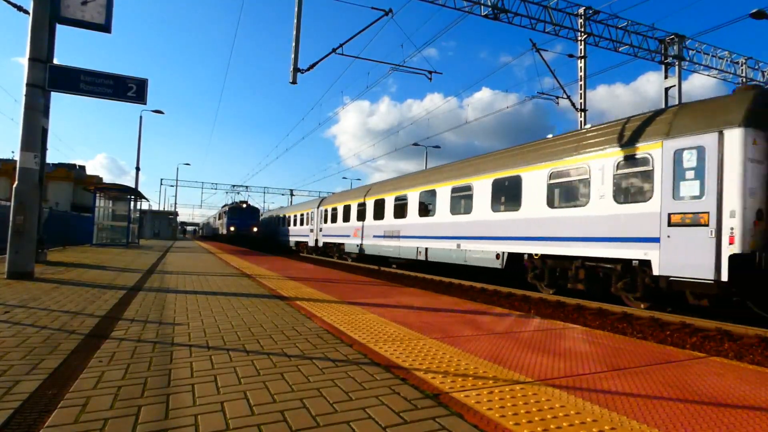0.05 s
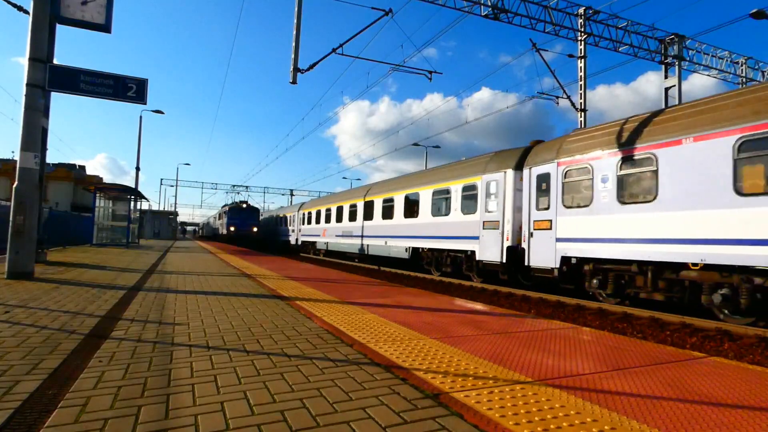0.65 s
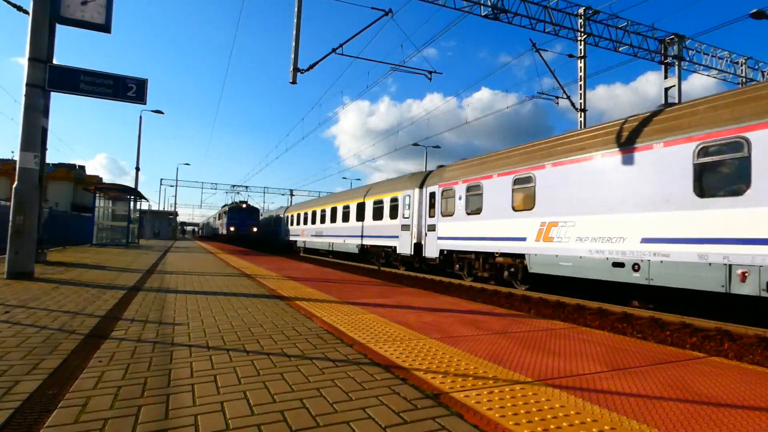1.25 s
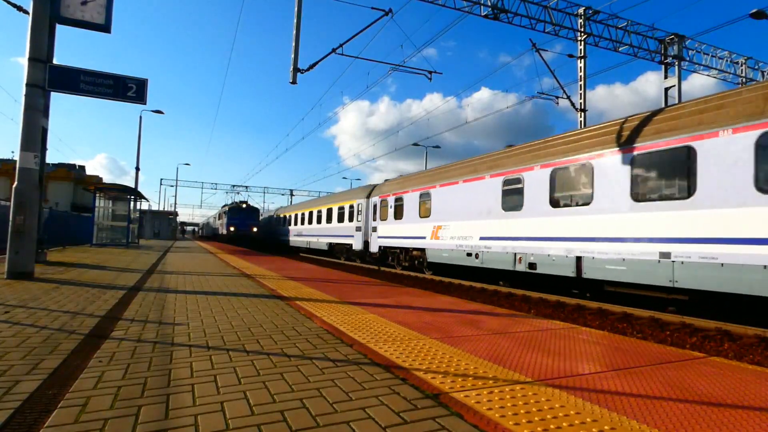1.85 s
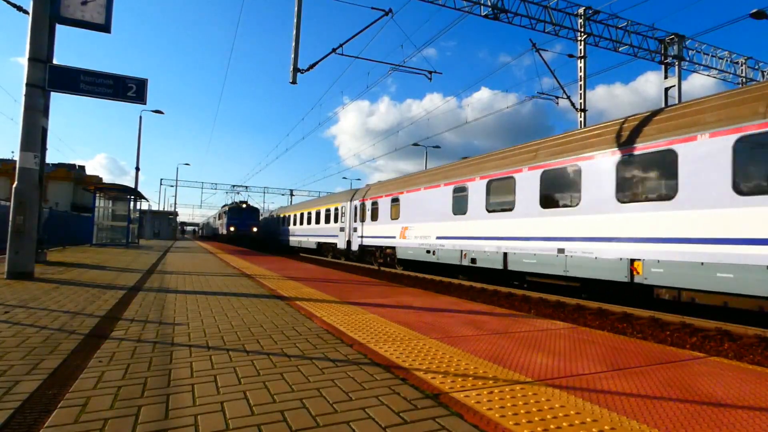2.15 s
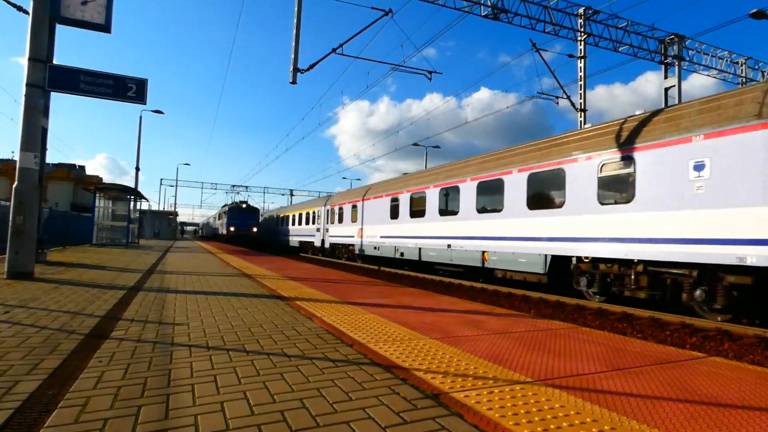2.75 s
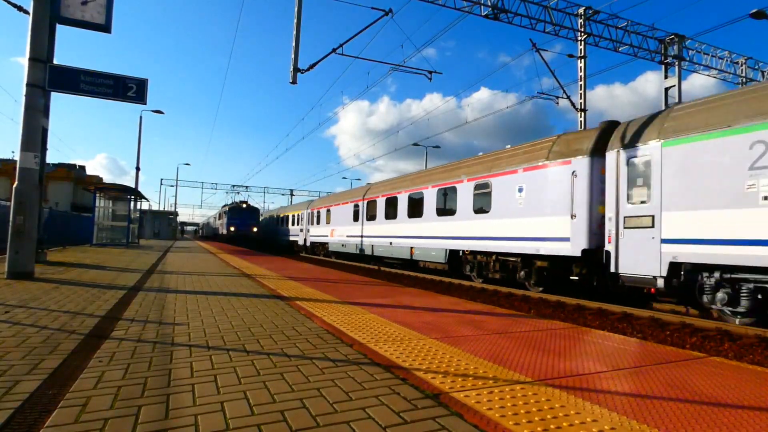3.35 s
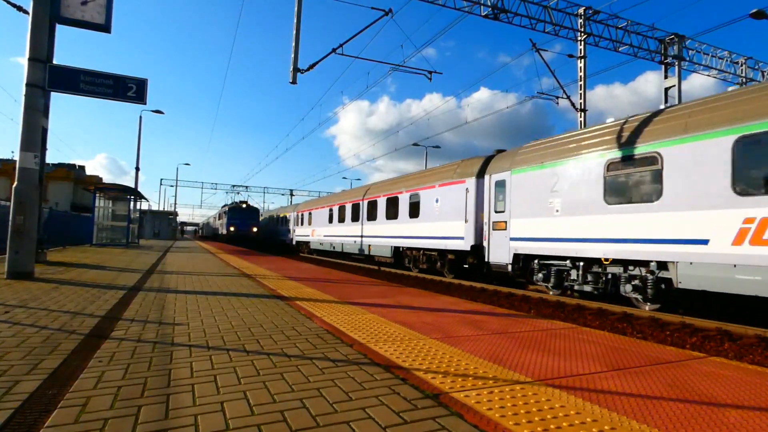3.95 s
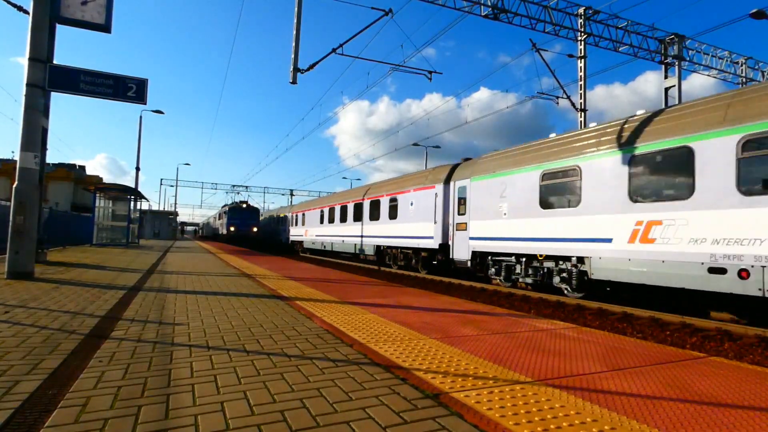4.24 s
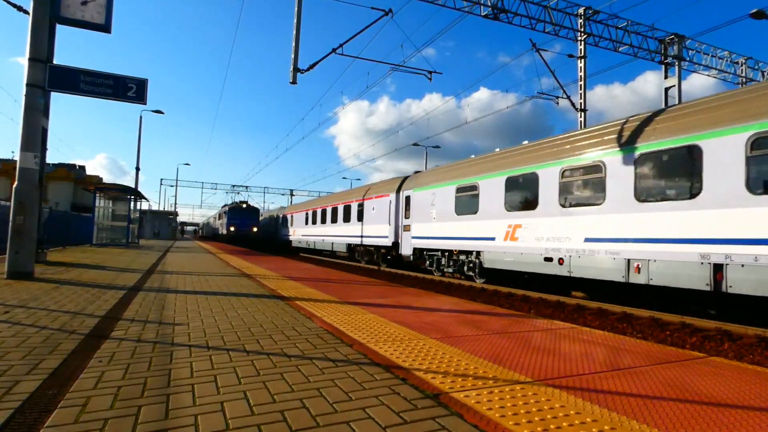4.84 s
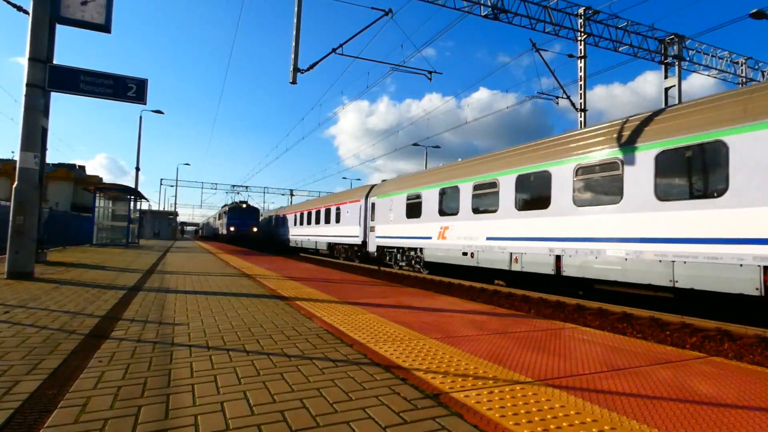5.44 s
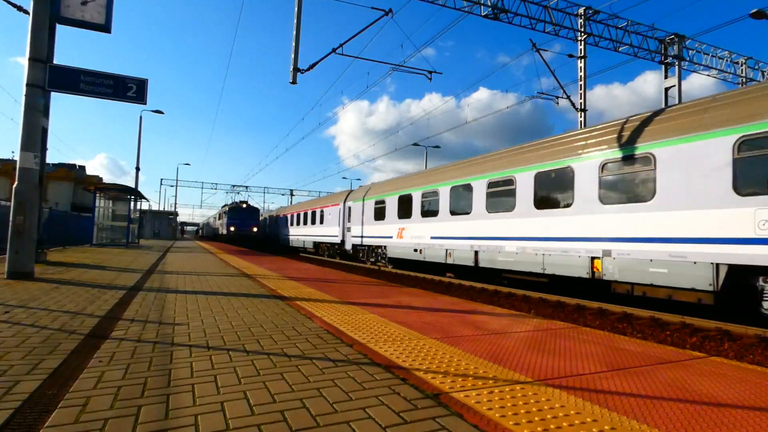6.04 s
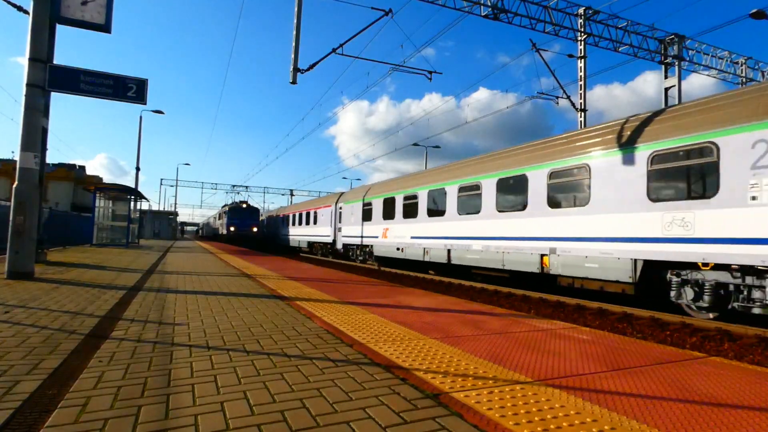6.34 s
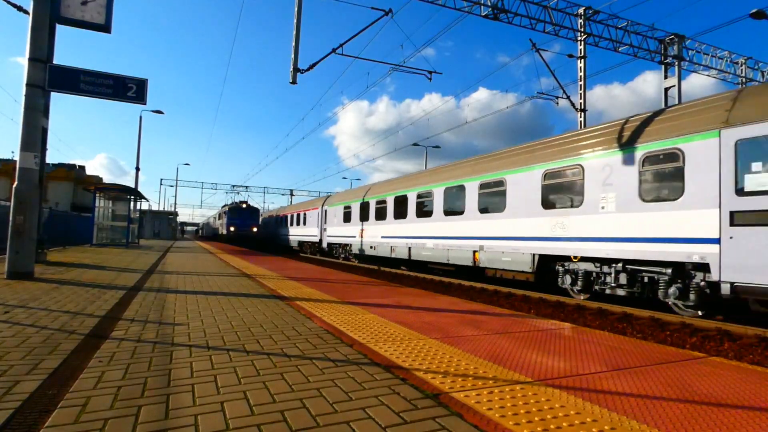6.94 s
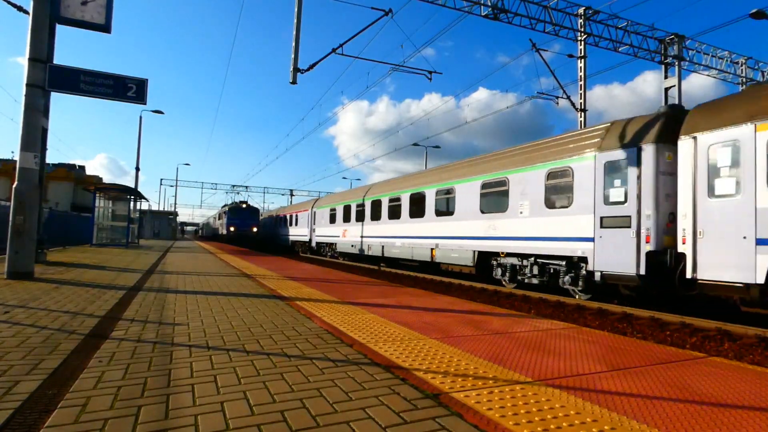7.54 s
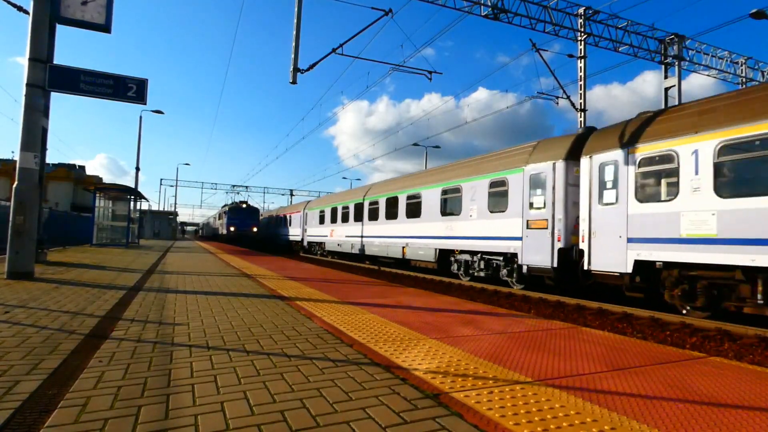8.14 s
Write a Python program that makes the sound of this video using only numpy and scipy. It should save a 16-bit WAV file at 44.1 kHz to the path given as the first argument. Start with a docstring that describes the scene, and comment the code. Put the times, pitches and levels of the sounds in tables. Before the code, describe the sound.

High, fluttering brake squeal from a slowing passenger train, over wheel rumble that gradually dies down.

```python
"""Station platform: a passenger train brakes to the right of a camera; the wheels' rumble dies down.
Two brake discs stick and slip, squealing near 4.6 kHz, each gliding down as it passes (Doppler),
over the blurred squeal of all the other bogies and the scrape of sliding pads.
Towards the end the pads grab: the squeal gains an undertone and rasps in short squeaks."""
import sys
import numpy as np
from scipy import signal
from scipy.fft import rfft, irfft, next_fast_len
from scipy.io import wavfile
from scipy.ndimage import uniform_filter1d, map_coordinates

SR = 44100
rng = np.random.default_rng(int(sys.argv[2]) if len(sys.argv) > 2 else 0)


def bounce(signal):
    """Save signal as a 16-bit WAV file at the path given by the first command-line argument."""
    frames = np.transpose(np.atleast_2d(signal))
    limited = np.clip(frames, -1, 1)
    pcm = np.round(limited * 32767).astype(np.int16)
    wavfile.write(sys.argv[1], SR, pcm)


N = 361179
TIME_S = np.arange(N) / SR
START_M_PER_S, BRAKING_M_PER_S2, SOUND_M_PER_S = 10.63, .68, 343
SPEED_M_PER_S = START_M_PER_S - BRAKING_M_PER_S2 * TIME_S

# Two loudest discs: pitch_hz, abreast_s, glide_width_m (how gradually the pitch falls in passing)
FIRST_DISC, SECOND_DISC = (4580, 2.0, 11), (4647, 6.92, 15.2)
# How hard the pads bite: time_s, bite_db. All table levels are relative.
PAD_BITE = [(0, -15.5), (1.5, -5.5), (2.1, -6.5), (2.45, 1), (3, 1), (3.5, -4), (3.9, 0), (4.6, -3.5),
            (5.4, -9), (5.7, -0.5), (5.95, -8), (6.25, -1), (6.5, -4), (6.8, 0.5), (7.15, -4.5), (8.19, -2)]


def amp(db):
    """dB to gain."""
    return 10 ** (np.asarray(db) / 20)


def unit(x):
    """Scale to rms 1."""
    return x / np.sqrt(np.mean(np.abs(x) ** 2) + 1e-20)


def along(points, hz):
    """Interpolate (freq_hz, value) rows on a log axis."""
    freq_hz, value = np.transpose(points)
    return np.interp(np.log(hz + 1), np.log(freq_hz + 1), value)


def curves(rows):
    """One per-sample curve for each column after time_s."""
    time_s, *columns = np.transpose(rows)
    return [np.interp(TIME_S, time_s, column) for column in columns]


def during(rows):
    """1 over a table's time span, with fades outside it."""
    start_s, end_s, fade_s = rows[0][0], rows[-1][0], .15
    return np.interp(TIME_S, [start_s - fade_s, start_s, end_s, end_s + fade_s], [0, 1, 1, 0])


def wobble(rate_hz):
    """Smooth random curve, rate_hz knots a second."""
    knots = rng.standard_normal(int(N * rate_hz / SR) + 4)
    return map_coordinates(knots, [TIME_S * rate_hz])


def filtered(x, response):
    """Apply a frequency response."""
    size = next_fast_len(N + SR // 4)
    return irfft(rfft(x, size) * response(np.fft.rfftfreq(size, 1 / SR)), size)[..., :N]


def side_gain(alike):
    """Side-to-mid ratio for a left-right correlation."""
    return np.tan(np.arccos(np.clip(alike, -1, 1)) / 2)


def stereo(pair, alike):
    """Mix two independent signals to left and right with correlation alike."""
    mid, side = pair[0], side_gain(alike) * pair[1]
    return np.array([mid + side, mid - side])


def pan(x, left_db):
    """Tilt a pair to the left."""
    return x * amp(np.array([left_db, -left_db]) / 2)


def tone(hz):
    """Complex oscillator; real part has rms 1."""
    return np.sqrt(2) * np.exp(2j * np.pi * np.cumsum(hz) / SR)


def rush(spectrum, patchy_db):
    """Stereo noise with time-frequency patches of random gain; mid has rms 1."""
    # Left-right likeness: freq_hz, correlation
    likeness = [(30, .35), (120, .88), (300, .92), (1000, .8), (2500, .8), (4600, .85), (8000, .6),
                (13000, .45)]
    bins = signal.stft(rng.standard_normal((2, N)), nperseg=512)[2]
    patches = uniform_filter1d(rng.standard_normal(bins.shape[1:]), size=5, axis=0)
    patches = uniform_filter1d(patches, size=14, axis=1)
    pair = signal.istft(bins * amp(patchy_db * unit(patches)), nperseg=512)[1][:, :N]
    mid = filtered(pair[0], lambda hz: amp(along(spectrum, hz)))
    side = filtered(pair[1], lambda hz: amp(along(spectrum, hz)) * side_gain(along(likeness, hz)))
    return np.array([mid + side, mid - side]) / np.std(mid)


def scatter(width_hz, alike, order=4):
    """Random complex gain per microphone: many moving paths beating within width_hz."""
    size = next_fast_len(N)
    lowpass = (1 + np.abs(np.fft.fftfreq(size, 1 / SR) / width_hz) ** order) ** -.5
    spectrum = rfft(rng.standard_normal((2, 2 * size)))[:, :size]
    return stereo(unit(np.fft.ifft(spectrum * lowpass)[:, :N]), alike)


def hum(rows, steady, spread_hz):
    """Unsteady tone: a steady part plus a scattered one."""
    hz, db = curves(rows)
    flutter = unit(steady + scatter(spread_hz, alike=.16))
    return during(rows) * amp(db) * np.real(flutter * tone(hz))


def passing(source):
    """A disc's place along the track (m, 0 abreast) and Doppler-shifted pitch (Hz)."""
    pitch_hz, abreast_s, glide_width_m = source
    travelled_m = np.cumsum(SPEED_M_PER_S) / SR
    place_m = travelled_m - travelled_m[round(abreast_s * SR)]
    receding_m_per_s = SPEED_M_PER_S * place_m / np.hypot(place_m, glide_width_m)
    return place_m, pitch_hz * (1 - receding_m_per_s / SOUND_M_PER_S)


def far_rumble():
    """The rest of the train, swelling as the middle coaches pass."""
    # Distant rumble: freq_hz, density_db
    spectrum = [(25, -58), (50, -35), (70, -17), (90, 0.5), (130, 1.5), (220, -1.5), (400, -8.5),
                (900, -42)]
    # Its swell: time_s, level_db
    swell = [(0, -52.5), (3, -57), (4, -51), (5.3, -51.5), (6.2, -57), (8.19, -59)]
    return amp(curves(swell)[0]) * rush(spectrum, patchy_db=3)


def gear_and_coach_hum():
    """Running gear whines and coach bodies drone faintly, sinking in pitch as the train slows."""
    # Both tones: time_s, pitch_hz, level_db
    whine = [(5.6, 780, -61), (6.4, 768, -69), (7.3, 741, -59), (8.19, 715, -62)]
    drone = [(5.0, 233.6, -60), (5.5, 226.2, -51.5), (6.3, 221.6, -55.5), (7.1, 221, -59)]
    return hum(whine, steady=1.4, spread_hz=5.6) + hum(drone, steady=.45, spread_hz=4.2)


def rolling():
    """Wheels on rails: track and coaches rumble, rails roar, the contact hisses with roar and bite."""
    # Rolling noise: time_s, rumble_db, roar_db
    levels = [(0, -28, -28), (.8, -34, -35), (1.3, -38.5, -39), (2.1, -42.5, -44), (3, -43, -44.5),
              (3.8, -41, -43), (5, -44.5, -44), (5.95, -49, -47.5), (6.25, -52.5, -45), (6.5, -54, -50.5),
              (7.9, -58.5, -52), (8.19, -58, -45.5)]
    # Track and coaches, rails, wheel-rail contact: freq_hz, density_db
    rumble = [(25, -50), (60, -39), (95, -23.5), (135, -15), (170, -5.5), (245, -2.5), (300, 0.5),
              (354, -6.5), (421, -0.5), (515, -3.5), (795, -10), (1170, -29.5), (2000, -78)]
    roar = [(350, -55), (600, -2), (672, -3.5), (901, -3.5), (1370, -2.5), (1520, -1), (2340, -4),
            (3340, -6), (4200, -12), (5460, -48), (9240, -120)]
    hiss = [(3000, -24), (4200, -2.5), (5400, 1), (6200, -1.5), (7000, -3.5), (7700, -10), (10000, -8.5),
            (11000, -19), (12300, -18.5), (13900, -36), (14400, -35), (15000, -55)]
    rumble_db, roar_db = curves(levels)
    hiss_db = .51 * roar_db + .21 * curves(PAD_BITE)[0] - 21
    uneven_db = .5 * wobble(14)
    return (amp(rumble_db + .5) * rush(rumble, patchy_db=1.5)
            + amp(roar_db + 2 + uneven_db) * rush(roar, patchy_db=1.46)
            + amp(hiss_db + uneven_db) * rush(hiss, patchy_db=2.5))


def pad_rubbing():
    """Sliding pads excite the discs in broad bands that grow with bite and fade as the train slows."""
    # Bands near the squeal's pitch, its half and its octave: freq_hz, density_db
    scrape = [(2600, -64), (3400, -10), (3700, -9.5), (4100, -3), (4400, 2), (4750, -0.5), (4920, 0),
              (5080, -3.5), (5400, -21.5), (6200, -36.5)]
    grind = [(1500, -32), (2050, -9.5), (2300, 0), (2450, -4), (2700, -9.5), (3300, -11.5), (4000, -31.5)]
    sizzle = [(7300, -17), (8400, -9), (8900, -1), (9100, 4.5), (9400, -4), (9800, -10), (11000, -17),
              (13000, -29)]
    bite_db, = curves(PAD_BITE)
    speed_db = 20 * np.log10(SPEED_M_PER_S / START_M_PER_S)
    bedding_in = np.clip(TIME_S / 2.65, 0, 1) ** 4
    return (amp(.17 * bite_db + 1.8 * speed_db - 29.5) * rush(scrape, patchy_db=2)
            + bedding_in * amp(.18 * bite_db + .42 * speed_db - 40) * rush(grind, patchy_db=2.5)
            + amp(bite_db + .33 * speed_db - 41) * rush(sizzle, patchy_db=2.3))


def bogie_chorus(pitch_hz=4601, spread_hz=51.5, fifth_db=-22.5, gain_db=-3):
    """The other bogies squeal in blurred bands: higher when coming, lower when going."""
    # Joint squeal: time_s, level_db
    level = [(0, -24.5), (1.5, -25.5), (2.2, -31), (2.7, -21), (3.5, -25), (4.3, -21.5), (5, -25.5),
             (5.6, -24.5), (6.2, -28), (6.9, -23.5), (8.19, -26)]
    # Bogie groups: heading (1 coming, 0 abreast, -1 going), level_db
    groups = [(.85, -5.5), (0, -5.5), (-.75, -5)]
    bands = 0
    for heading, db in groups:
        shifted_hz = pitch_hz * (1 + heading * SPEED_M_PER_S / SOUND_M_PER_S)
        bands += amp(db) * scatter(spread_hz, alike=.97, order=6) * tone(shifted_hz)
    pressing = np.clip(TIME_S / 4.7, 0, 1) ** 2  # hard-pressed pads add a partial near 3/2 of the pitch
    fifth = pressing * amp(fifth_db) * scatter(110, alike=.47) * tone(np.full(N, 1.5 * pitch_hz + 60))
    return amp(curves(level)[0] + gain_db) * np.real(bands + fifth)


def pad_squeaks(squeak_db=1, rasp_db=1.5, detune=.0089, waver_hz=36):
    """Each grab of a pad is a short pitched squeak that also rasps through the rigging's modes."""
    # Pad grabs: peak_s, pitch_hz, peak_db, half_width_s
    grabs = [(2.93, 3570, -43.5, .05), (5.05, 3460, -45, .04), (5.15, 3400, -44, .04),
             (5.53, 3445, -39, .035), (5.77, 3420, -44, .04), (6.07, 3430, -41, .07),
             (6.15, 3420, -38, .05), (6.22, 3415, -39, .04), (6.31, 3400, -35, .06), (6.6, 3450, -34, .035),
             (6.78, 3420, -36, .045), (6.9, 3390, -37, .05), (7.1, 3485, -37.5, .03),
             (7.22, 3440, -35, .04), (7.36, 3470, -42, .05), (7.44, 3460, -38, .04),
             (7.56, 3360, -40, .045), (7.63, 3395, -42, .04), (7.76, 3440, -40, .045),
             (7.93, 3420, -43, .035), (8.15, 3445, -42, .035)]
    # Brake rigging modes: freq_hz, width_hz, level_db
    rigging = [(1253, 65, -6), (1500, 50, -11), (1630, 140, -9.5), (2420, 360, -4), (3273, 110, 2.5),
               (4000, 150, -7), (5580, 97, -6.5), (5880, 37, 0.5), (7900, 180, -14), (11683, 240, -19)]
    out, size = np.zeros((2, N + SR)), SR // 4
    offset_s = (np.arange(size) - size // 2) / SR
    freq_hz = np.fft.rfftfreq(size, 1 / SR)
    mode_hz, width_hz, mode_db = np.transpose(rigging)[:, :, None]
    drift_hz = np.pad(waver_hz * wobble(130), size)
    for peak_s, pitch_hz, peak_db, half_width_s in grabs:
        start = round(peak_s * SR) - size // 2
        centre_hz = mode_hz * (1 + detune * rng.standard_normal(mode_hz.shape))
        gains = amp(mode_db + 2 * rng.standard_normal(mode_hz.shape))
        response = np.sum(gains / (1 + 1j * (freq_hz - centre_hz) / width_hz) ** 2, axis=0)
        ringing = irfft(rfft(rng.standard_normal((2, size))) * response, size)
        rasp = unit(stereo(ringing, alike=.36))
        squeak = np.real(tone(pitch_hz + drift_hz[start + size:][:size]))
        swell = amp(peak_db) * np.exp(-2 * (offset_s / half_width_s) ** 2)
        out[:, start:start + size] += swell * (amp(squeak_db) * squeak + amp(rasp_db) * rasp)
    return out[:, :N]


def disc_undertone(gain_db=-.5, fifth_db=-11, half_width_s=.051):
    """The disc more nearly abreast slips unevenly on alternate cycles: lines at 1/2 and 3/2 pitch."""
    # Bouts of uneven slip: peak_s, peak_db
    slips = [(2.21, -40), (5.14, -44), (5.68, -44), (6.3, -37.5), (6.63, -42), (6.75, -35.5), (6.86, -35.5),
             (7.09, -39), (7.21, -40), (7.38, -39), (7.5, -39), (7.6, -31), (7.76, -34.5), (7.9, -36),
             (7.97, -39.5)]
    first_m, first_hz = passing(FIRST_DISC)
    second_m, second_hz = passing(SECOND_DISC)
    half_hz = np.where(np.abs(first_m) < np.abs(second_m), first_hz, second_hz) / 2
    bouts = sum(amp(db + gain_db) * np.exp(-2 * ((TIME_S - s) / half_width_s) ** 2) for s, db in slips)
    paths = .89 + .46 * scatter(22, alike=.65)
    return bouts * np.real(paths * (tone(half_hz) + amp(fifth_db) * tone(3 * half_hz)))


def disc_squeal(source, level, gain_db, echo_db, spread_hz, octave_db, waver_hz, third_db=-43):
    """A disc's stick-slip tone glides down in passing; echoes off coaches and platform make it flutter."""
    place_m, hz = passing(source)
    hz = hz + waver_hz * wobble(25)
    paths = (1 + amp(echo_db) * scatter(spread_hz, alike=.77)) / np.hypot(1, amp(echo_db))
    overtones = amp(octave_db) * tone(2 * hz) + amp(third_db) * tone(3 * hz)
    overtone_gain = amp(.62 * curves(PAD_BITE)[0]) * unit(1.2 + scatter(24, alike=.092))
    envelope = during(level) * amp(curves(level)[0] + gain_db)
    squeal = envelope * np.real(paths * tone(hz) + overtone_gain * overtones)
    swing = np.exp(-((place_m + 6.1) / 13.5) ** 2)  # furthest right 6.1 m before abreast
    return pan(squeal, left_db=4.5 - 7.5 * swing)


def microphone_ports(hz):
    """Level and phase at the two ports for sound from the right; the camera body delays one."""
    # Phase between ports: freq_hz, left_lead_rad
    lead = [(150, 0.88), (600, -1.17), (1700, -0.32), (6000, 0.54), (8500, 0.93), (9300, 1.68)]
    # Balance: freq_hz, left_minus_right_db
    balance = [(60, -3), (110, 0), (380, 0.2), (690, -5), (1280, -9), (2360, -7.5), (4350, -6),
               (8020, -3.5), (14800, 5)]
    phase_rad = along(lead, hz) / 2
    return pan(np.exp(1j * np.array([phase_rad, -phase_rad])), along(balance, hz))


def scene():
    """The whole train, placed to the right."""
    # Lower squeal line; glides down early, fades, and a squeal near 4.5 kHz sounds late: time_s, level_db
    lower_level = [(0, -32), (.3, -27.5), (1.15, -23), (1.3, -26.5), (1.62, -21), (1.85, -26), (2.05, -20),
                   (2.26, -24.5), (2.43, -19.5), (2.58, -25), (2.9, -24), (3.45, -32.5), (3.75, -26.5),
                   (4.6, -32.5), (5.2, -47), (6.48, -49), (6.7, -23), (7.05, -38), (8.19, -32.5)]
    # Upper squeal line: time_s, level_db
    upper_level = [(2, -44), (4.12, -37.5), (4.35, -20.5), (4.6, -28.5), (4.85, -23), (5.35, -23.5),
                   (5.6, -30), (5.9, -21), (6.03, -29), (6.4, -19.5), (6.6, -25), (6.82, -29.5),
                   (7.05, -21.5), (7.27, -20.5), (7.45, -26), (7.73, -19.5), (8, -25.5), (8.12, -20),
                   (8.19, -21.5)]
    lower = disc_squeal(FIRST_DISC, lower_level, gain_db=-.36, echo_db=-5,
                        spread_hz=38, octave_db=-25, waver_hz=3.35)
    upper = disc_squeal(SECOND_DISC, upper_level, gain_db=-.6, echo_db=-6.5,
                        spread_hz=27, octave_db=-23, waver_hz=3.885)
    brakes = lower + upper + bogie_chorus() + disc_undertone() + pad_squeaks()
    background = rolling() + pad_rubbing() + far_rumble() + gear_and_coach_hum()
    return filtered(brakes + background, microphone_ports)


def record(dry):
    """The camera's band limit."""
    return filtered(dry, lambda hz: hz < 14700)


dry = scene()
out = record(dry)
bounce(out)
```